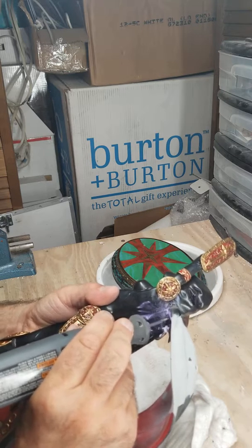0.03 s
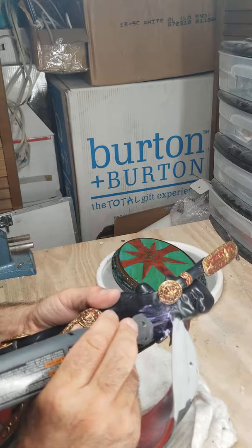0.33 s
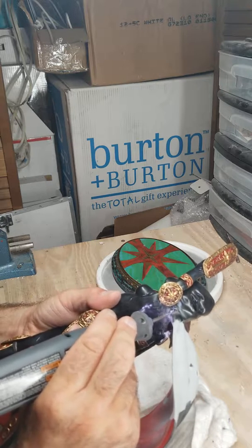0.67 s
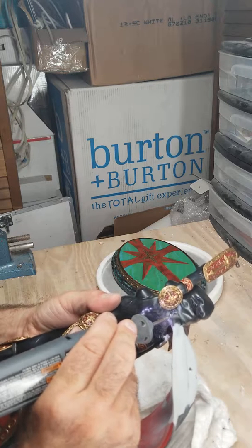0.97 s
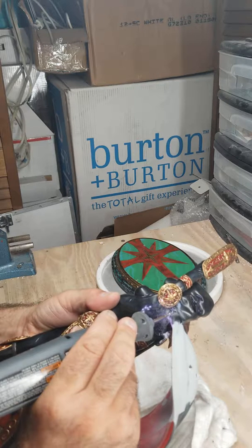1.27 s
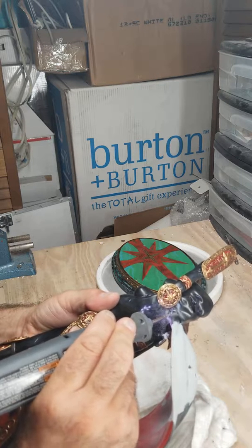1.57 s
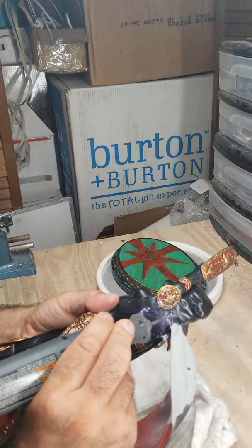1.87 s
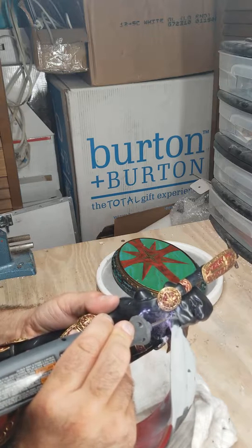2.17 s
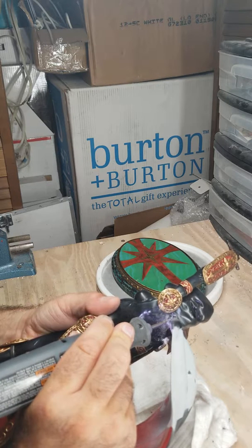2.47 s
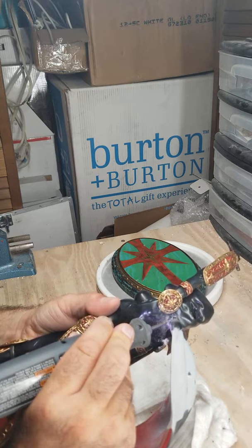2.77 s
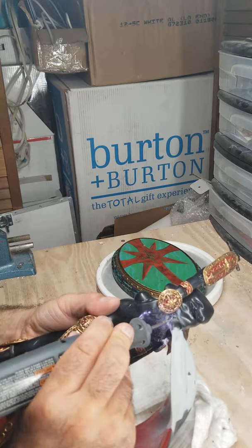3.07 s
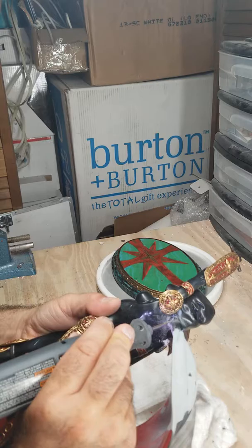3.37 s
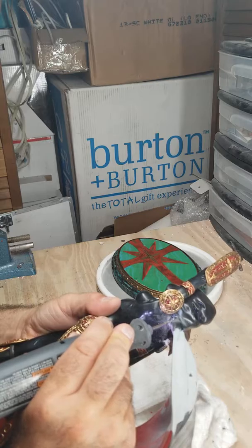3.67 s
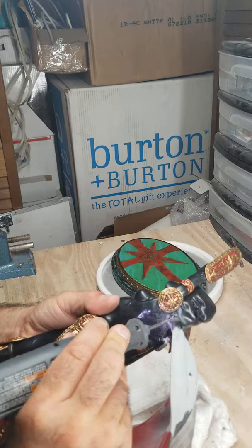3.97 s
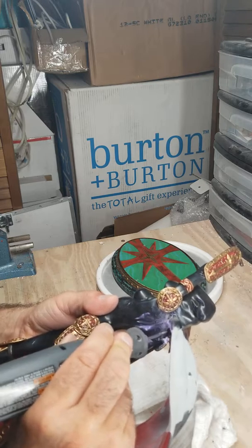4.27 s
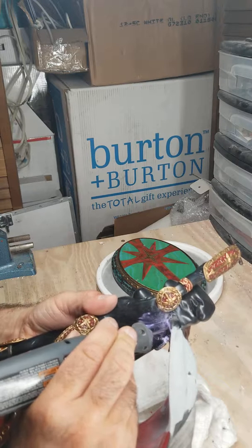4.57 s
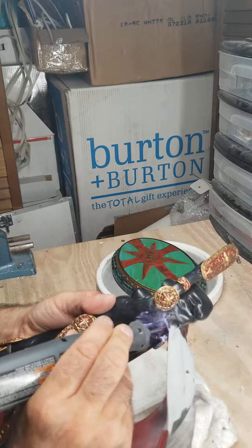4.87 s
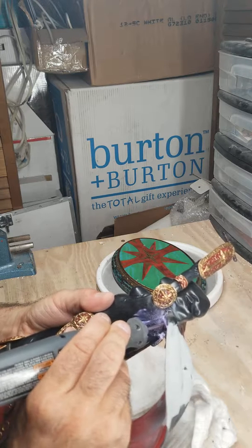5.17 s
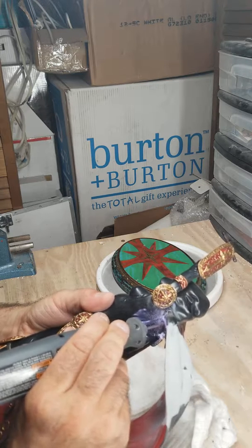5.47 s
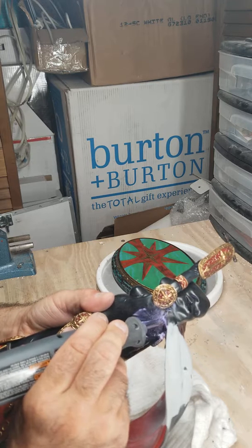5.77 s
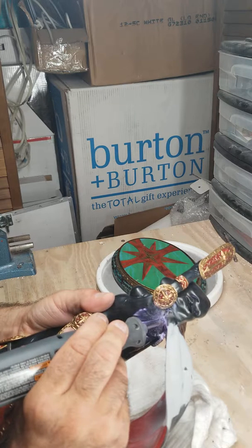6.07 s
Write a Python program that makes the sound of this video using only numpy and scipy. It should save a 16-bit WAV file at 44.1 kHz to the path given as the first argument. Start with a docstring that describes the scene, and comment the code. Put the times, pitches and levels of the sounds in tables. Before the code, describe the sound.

Close to the microphone in a small room, a rotary tool grinds metal with a whine and a gritty hiss. The bit skitters and squeaks at first, then settles into the cut, where the motor pitch drops and a piercing whistle takes over. The grinding stops for a moment while the motor runs free, then the bit skids back on and chatters.

```python
"""Rotary tool grinding a metal rod

A small workshop, a two-port microphone close to a cordless tool. The motor whines and sags under load.
The bit rasps and hisses with every turn, knocks as it skids, squeals when it binds, whistles once seated
in the cut and chatters on every second turn. Near 4 s it is lifted, spins up and is set down again."""
import sys
import numpy as np
from scipy import signal
from scipy.fft import rfft, irfft
from scipy.io import wavfile
from scipy.ndimage import uniform_filter1d, map_coordinates

SR = 44100
rng = np.random.default_rng(int(sys.argv[2]) if len(sys.argv) > 2 else 0)


def transcribe(signal):
    """Save signal, clipped to [-1, 1], as a 16-bit WAV file at the path in sys.argv[1]."""
    frames = np.atleast_2d(signal).T
    limited = np.clip(frames, -1, 1)
    pcm = np.round(limited * 32767).astype(np.int16)
    wavfile.write(sys.argv[1], SR, pcm)


N = 278174
TIME = np.arange(N) / SR
HZ = np.fft.rfftfreq(N, 1 / SR)
RIM_HZ, RIM_HALF_WIDTH_HZ = 12940, 550  # high resonance of the bit that picks out overtones

# motor tones: t/s, unbalance hum/dB, third order/dB, whine/dB
MOTOR_LEVELS = [(0, -56, -37, -39), (.18, -54, -34.5, -41.5), (.2, -50.5, -30.5, -37), (.29, -59, -29, -41),
                (.31, -45, -35.5, -37.5), (.53, -46.5, -32, -34.5), (.55, -57, -41, -45),
                (.73, -47.5, -32, -28.5), (.785, -52, -45.5, -28), (.88, -52, -35, -33.5),
                (1.03, -55.5, -36, -31.5), (1.12, -54, -43, -37.5), (1.48, -54.5, -41, -41),
                (1.66, -50.5, -67, -35), (1.8, -48, -72, -37.5), (2.1, -48, -54, -38.5),
                (2.6, -47, -56, -39), (2.85, -47, -68, -38), (3.75, -47, -64, -42.5), (3.95, -50, -57, -36),
                (4.02, -68, -50, -51), (4.14, -61, -42.5, -41.5), (4.76, -60, -37, -47),
                (4.84, -47, -37, -36.5), (5.6, -43, -41.5, -45.5), (6.31, -42, -42.5, -48.5)]
# whistle of the seated bit: t/s, lower partial/dB, upper partial/dB, sidebands/dB
WHISTLE_LEVELS = [(2.55, -90, -90, -90), (2.66, -41, -34, -37), (2.71, -48, -26, -38),
                  (2.77, -36, -20, -31), (2.85, -27, -15.5, -26), (2.96, -27, -16, -26),
                  (3.03, -37, -17, -30.5), (3.14, -25, -21.5, -32.5), (3.21, -22, -12.5, -27.5),
                  (3.28, -23, -16, -26), (3.37, -16, -14, -23), (3.43, -18, -16, -22.5),
                  (3.5, -16.5, -25, -26), (3.58, -14, -10, -23.5), (3.69, -14.5, -13, -23),
                  (3.845, -14.5, -15, -26), (3.88, -43, -34, -48), (3.98, -90, -90, -90)]


def gain_of(db):
    """Decibels to amplitude."""
    return 10 ** (np.asarray(db) / 20)


def unit_rms(x):
    """Scale to an rms of 1."""
    return x / np.sqrt(np.mean(x ** 2) + 1e-20)


def at_hz(points, hz):
    """Interpolate a table over log frequency."""
    f, value = np.transpose(points)
    return np.interp(np.log(hz + 1), np.log(f + 1), value)


def colour(x, spectrum):
    """Filter by a table of gains, then scale to rms 1."""
    return unit_rms(irfft(rfft(x) * gain_of(at_hz(spectrum, HZ)), N))


def wander(rate_hz):
    """Random drift of rms 1, up to the given rate."""
    return unit_rms(irfft(rfft(rng.standard_normal(N)) / (1 + (HZ / rate_hz) ** 4), N))


def curves(rows):
    """Each column of a table, joined by straight lines in time."""
    times, *columns = np.transpose(rows)
    return [np.interp(TIME, times, c) for c in columns]


def sum_db(*levels):
    """Joint level of unrelated sounds."""
    return 10 * np.log10(sum(gain_of(db) ** 2 for db in levels) + 1e-20)


def events(rows, attack_s=0.045, release_s=0.04):
    """Swell, hold and fade (times per 20 dB): joint level, then other columns weighted by amplitude."""
    start, end, db, *columns = np.transpose(rows)[:, :, None]
    db = db - 20 * (np.maximum(start - TIME, 0) / attack_s + np.maximum(TIME - end, 0) / release_s)
    weight = gain_of(db - db.max(0))
    return [sum_db(*db)] + [(weight * c).sum(0) / weight.sum(0) for c in columns]


def ports(x):
    """The tool lies off to one side, so the microphone's ports hear different delay and shading."""
    # phase between the ports: f/Hz, lag of the left/rad
    lag = [(20, 0), (250, -0.4), (1000, 0.51), (1500, 2), (1900, 1.23), (2600, 1.72), (4400, 2.5),
           (5200, 2), (5850, 4.5), (6150, 4), (6400, 4.5), (7000, 4.5), (9000, 4.5), (12000, 6),
           (15000, 12.5)]
    # shading: f/Hz, left minus right/dB
    balance = [(20, 8), (270, -4), (520, 4.5), (1000, -5), (1500, 5), (2100, -1.5), (2600, 5.5),
               (4200, -1.5), (5500, 4.5), (6500, 1.5), (7400, 7), (9000, -2.5), (12500, -3), (15000, 0)]
    delay = np.exp(-1j * at_hz(lag, HZ))
    lean = gain_of(at_hz(balance, HZ) / 2)
    return irfft(rfft(x) * np.array([delay * lean, 1 / lean]), N)


def background(noise_db=-72, mains_hz=60, mains_db=-78):
    """Faint room tone and mains hum."""
    # room tone: f/Hz, level/dB
    spectrum = [(20, -15), (45, 2), (60, 6.5), (120, -1.5), (250, 7.5), (1000, -56), (16000, -39)]
    mid, side = (colour(rng.standard_normal(N), spectrum) for _ in range(2))
    mains = gain_of(mains_db) * np.sin(2 * np.pi * mains_hz * TIME)
    return gain_of(noise_db) * (mid + 0.41 * np.array([side, -side])) + mains


def workshop(x, early_boost=2.96, early_s=0.012, length=12000):
    """Bench and boxes throw back dense early echoes and a short tail, different at each port."""
    # colour of the echoes: f/Hz, level/dB
    spectrum = [(200, -2), (600, -4), (1000, 0), (2000, 0.5), (6000, -4), (9000, -2.5), (15000, 1.5)]
    # reverberation time: f/Hz, t60/s
    decay = [(200, 0.063), (2000, 0.2), (8000, 0.33), (16000, 0.048)]
    t = np.arange(length) / SR
    taps = rng.standard_normal((2, length)) * (rng.random((2, length)) < .1) * (t > .001)
    taps *= 1 + early_boost * np.exp(-t / early_s)
    hz, age, bands = signal.stft(taps, SR, nperseg=256)
    bands = bands * gain_of(-60 * age / at_hz(decay, hz)[:, None])
    tail = signal.istft(bands, SR, nperseg=256)[1]
    tail /= np.linalg.norm(tail, axis=1, keepdims=True)
    wet = signal.fftconvolve(x, tail, axes=1)[:, :N]
    return irfft(rfft(wet) * gain_of(at_hz(spectrum, HZ)), N)


def shaft_tone(turns, order, db, flutter_db):
    """One multiple of the shaft rate, fluttering in level."""
    amplitude = np.sqrt(2) * gain_of(db + flutter_db * wander(33))
    return amplitude * np.sin(2 * np.pi * (order * turns + rng.random()))


def hum(turns):
    """Unbalance shakes the tool once a turn; the second order grows faster when it is pressed down."""
    db = curves(MOTOR_LEVELS)[0]
    return shaft_tone(turns, 1, db, flutter_db=1.06) + shaft_tone(turns, 2, 2 * db + 45.5, flutter_db=1)


def whine(turns, speed, load):
    """Commutator and fan orders: load shifts their weights, and each swells near a shell resonance."""
    # whine partials: shaft order, running free/dB, under load/dB
    weights = [(5, -2.5, -15), (6, -4, -6), (7, -13.5, -14), (8, -10.5, -16.5), (9, -7.5, -8.5),
               (10, -24, -10.5), (11, -13, -16.5), (12, -18, -16), (13, -28, -13), (14, -21, -30),
               (15, -12.5, -23), (16, -22, -19), (17, -31, -30), (18, -21, -52), (23, -27, -16),
               (24, -19, -32), (27, -20, -7)]
    # resonances of the tool's shell: f/Hz, half width/Hz, boost/dB
    shell = [(1031, 4, 8), (1868, 39, 7.5), (2250, 168, 5)]
    _, third_db, whine_db = curves(MOTOR_LEVELS)
    partials = [(3, third_db + 0.5), (4, -46 + 4 * load)]
    partials += [(round(k), whine_db + free + load * (loaded - free)) for k, free, loaded in weights]
    out = 0
    for order, level in partials:
        boost_db = sum(db / (1 + ((order * speed - hz) / width) ** 2) for hz, width, db in shell)
        out = out + shaft_tone(turns, order, level + boost_db, flutter_db=1.36)
    return out


def singing(width_hz=45):
    """Light rubbing keeps one narrow mode of the bit ringing."""
    # light rubs: start/s, end/s, level/dB, f/Hz
    rubs = [(1.77, 1.81, -36.5, 6510), (1.84, 1.98, -36, 6560), (2.02, 2.07, -41.5, 6400),
            (2.13, 2.29, -35, 6406), (2.3, 2.62, -37, 6095), (5.3, 6.31, -41, 6146)]
    db, hz = events(rubs)
    drive = wander(width_hz) + 1j * wander(width_hz)
    return gain_of(db) * (drive * np.exp(2j * np.pi * np.cumsum(hz) / SR)).real


def rod(knocks):
    """The rod and its holder ring after each knock."""
    # their modes: f/Hz, width/Hz, level/dB
    modes = [(142, 48, -36), (931, 94, 1), (1086, 65, 0), (1280, 160, -1), (1726, 150, 0.5),
             (1940, 280, -11), (2125, 108, -4.5), (2610, 240, -12.5), (3190, 270, -8), (4300, 3300, -15)]
    body = 0
    for k, (hz, width, db) in enumerate(modes):
        weight = (-1) ** k * gain_of(db) * np.minimum(HZ / hz, 1) ** 0.61
        body = body + weight / (1 + 1j * (HZ ** 2 - hz ** 2) / (width * HZ + 1))
    return unit_rms(irfft(rfft(knocks) * body, N))


def chatter(turns, db, even_harmonic_cut=0.076, slip_turns=0.0039, unevenness=0.13):
    """An uneven knock on every second turn rings the rod, its whole-turn harmonics slightly softer."""
    turns = turns + slip_turns * wander(150)
    knocks = sum((1 - even_harmonic_cut * (-1) ** k) * np.cos(np.pi * k * turns) for k in range(1, 50))
    return rod(knocks * (1 + unevenness * wander(110))) * gain_of(db + 3.5)


def skidding(turns, db, hit_share=0.65, scatter_db=3.5, slip_turns=0.1):
    """The skidding bit catches the rod on some turns and misses on others, with knocks of uneven size."""
    # how hard a knock drives the rod: f/Hz, level/dB
    spectrum = [(200, -28), (550, -13), (900, -7), (1700, -5), (2300, 8.5), (3300, 4), (5000, 6),
                (9000, -7), (16000, -19)]
    turn = np.maximum.accumulate(np.floor(turns + slip_turns * wander(150)))
    hits = np.diff(turn, prepend=turn[0]) * (rng.random(N) < hit_share)
    knocks = hits * gain_of(scatter_db * np.minimum(rng.standard_normal(N), 1.5))
    return colour(rod(knocks), spectrum) * gain_of(db - 3.5)


def squeal(turns, speed, load, db, hz, scatter, bend=0.11, arch=15.5, overtone_db=-12):
    """Stick-slip on the wall of the cut rings once a turn; light load makes short, widely swept rubs."""
    shortness = 9.2 - 7 * load
    turn, angle = turns.astype(int), turns % 1 - .5
    slip, jolt = rng.standard_normal((turn[-1] + 1, 2)).T
    cycles = hz * angle / speed + bend * shortness ** 2 * angle ** 2 + arch * angle * (angle ** 2 - .05)
    phase = 2 * np.pi * cycles + scatter * (0.24 * slip[turn] + .5 * wander(510))
    burst = np.abs(np.cos(np.pi * angle)) ** shortness * shortness ** 0.45
    burst *= gain_of(3 * scatter * jolt[turn])
    ring = unit_rms(burst * np.sin(phase))
    # the overtone comes late in each rub, and mostly from long, full rubs
    overtone = unit_rms(burst * np.exp(3 * angle) * np.sin(2 * phase + 2 * np.pi * 3 * turns)) / shortness
    overtone = irfft(rfft(overtone) / (1 + 1j * (HZ - RIM_HZ) / RIM_HALF_WIDTH_HZ), N)
    return (ring + gain_of(overtone_db) * overtone) * gain_of(db + 0.39 * wander(25))


def whistle(turns, speed, lower_order=23, upper_order=24, sway_db=2, sweep=0.42):
    """Deep in the cut the bit's ring locks to the shaft: two partials, sidebands and a high overtone."""
    # sidebands from each turn's rub: shaft order, level/dB
    sidebands = [(20, -24), (21, -10), (22, -3), (25, 0), (26, 2.5), (27, -8), (28, -4.5), (29, -9),
                 (30, -17), (31, -17), (32, -29)]
    lower_db, upper_db, sides_db = curves(WHISTLE_LEVELS)
    partials = [(lower_order, lower_db), (upper_order, upper_db)]
    partials += [(round(k), sides_db + db + sway_db * wander(15)) for k, db in sidebands]
    for k in range(45, 56):
        rim_db = -20 * np.log10(1 + ((k * speed - RIM_HZ) / RIM_HALF_WIDTH_HZ) ** 2)
        partials.append((k, sides_db - 5 + rim_db + sway_db * wander(34)))
    out = 0
    for k, db in partials:
        phase = 2 * np.pi * k * turns + sweep * (k - upper_order) ** 2
        out = out + gain_of(db - 2.5) * np.cos(phase)
    return np.sqrt(2) * out


def grit(turns, spectrum, memory, grain_db, throb, scattered_share, grains=160):
    """The grains round the rim strike again every turn, slowly wearing; the high side bites hardest."""
    def strikes():
        fresh = rng.standard_normal((int(turns[-1]) + 40, grains))
        rim = signal.lfilter([1], [1, -memory], fresh, axis=0)[30:]
        rim *= gain_of(grain_db * rng.standard_normal(rim.shape))
        passing = map_coordinates(rim.ravel(), [turns * grains], order=3)
        return colour(passing * np.exp(-throb * np.cos(2 * np.pi * turns)), spectrum)

    direct = ports(strikes())
    scattered = ports(strikes()) * np.array([[1], [-1]])  # arrives from all round the cut
    return np.sqrt(1 - scattered_share) * direct + np.sqrt(scattered_share) * scattered


def abrasion(load, bind_db, chatter_db, skid_db, contact_db=-45):
    """Rasp and hiss levels: skids and bounces add rasp, and a binding bit tears off more chips."""
    # how hard the grit cuts: t/s, hiss level/dB
    cutting = [(0, -43.5), (.18, -45.5), (.21, -38.5), (.45, -38.5), (.6, -46), (.7, -34), (1.05, -33),
               (1.22, -37), (1.27, -33), (1.75, -38), (2.65, -39), (3.96, -35), (4.02, -57), (4.42, -49),
               (4.56, -40.5), (4.8, -46.5), (5.55, -41.5), (6.31, -44)]
    cut_db, = curves(cutting)
    lifted_db = 0.29 * np.minimum(cut_db - contact_db, 0)  # the rasp fades as the bit lifts
    rasp_db = sum_db(-39.5 + 0.5 * load + lifted_db, skid_db - 3, chatter_db - 6)
    hiss_db = sum_db(cut_db, bind_db - 3 - 17 * load)
    return rasp_db, hiss_db


def grinding(turns, load, rasp_db, hiss_db):
    """Grit shakes the rod with a rasp and tears off chips with a hiss; both buzz in steady contact."""
    # rasp of the rod: f/Hz, level/dB
    rasp_spectrum = [(20, -44), (100, -24), (250, -19), (450, -6.5), (650, -10.5), (850, 1), (1500, -1.5),
                     (2000, -2), (2700, -3.5), (3400, -5), (4300, -8.5), (6500, -10), (9000, -27),
                     (16000, -11.5)]
    # hiss of the chips: f/Hz, level/dB
    hiss_spectrum = [(1500, -31.5), (3000, -4), (4000, -17), (5300, 3), (7400, 5), (8500, 0), (10000, -0.5),
                     (11500, 1.5), (12600, 6), (14000, -3.5), (15800, 5)]
    # each turn repeats the last best when the bit is loaded and the rod is still
    repeats = np.clip(1 - (rasp_db + 41) / 11, .1, 1) * (0.41 + .55 * load ** 2)
    bite = wander(85)
    coarse = grit(turns, rasp_spectrum, memory=0.37, grain_db=4.5, throb=0.29, scattered_share=0.28)
    buzz = grit(turns, rasp_spectrum, memory=0.9, grain_db=1, throb=0.36, scattered_share=0.3)
    rasp = np.sqrt(repeats) * buzz + np.sqrt(1 - repeats) * coarse
    loose = grit(turns, hiss_spectrum, memory=0, grain_db=-2, throb=0.078, scattered_share=1)
    steady = grit(turns, hiss_spectrum, memory=0.904, grain_db=-1.5, throb=0.29, scattered_share=0.22)
    hiss = np.sqrt(repeats) * steady + np.sqrt(1 - repeats) * loose
    return rasp * gain_of(rasp_db - 1 + 0.38 * bite) + hiss * gain_of(hiss_db + 4 + 1.65 * bite)


def scene(free_hz=298.5, loaded_hz=255.6, inertia_s=0.045):
    """One shaft drives the tool's sounds, its sag telling the load; tones arrive drier than grinding."""
    # shaft speed: t/s, f/Hz
    shaft = [(0.0, 305.1), (0.25, 310.1), (0.49, 292.5), (0.67, 302.1), (0.8, 291.3), (1.04, 284.9),
             (1.23, 296.2), (1.52, 283.1), (1.57, 279.3), (1.72, 273.9), (2.13, 251.7), (2.39, 244.3),
             (2.66, 259.7), (3.05, 259.5), (3.7, 254.7), (3.85, 255.7), (4.08, 297.9), (4.24, 306.8),
             (4.53, 309.1), (4.84, 282.6), (5.02, 275.8), (5.65, 274.7), (5.9, 270.5), (6.31, 272.0)]
    # the bit binds in the cut: start/s, end/s, squeal level/dB, f/Hz, turn-to-turn scatter (factor)
    binds = [(.705, .725, -27, 5650, 0.58), (.745, .775, -19, 5580, 0.45), (.818, .84, -20.5, 5600, 0.77),
             (.888, .955, -17, 5500, 0.21), (.97, 1.015, -19, 5460, 0.14), (1.035, 1.06, -29, 5400, 0.87),
             (1.39, 1.422, -23, 5700, 0.55), (1.44, 1.453, -32, 5800, 0.51),
             (1.498, 1.512, -21.5, 5700, 0.54), (1.53, 1.543, -28, 6000, 0.43),
             (1.58, 1.6, -25.5, 6100, 0.44), (1.632, 1.688, -21.5, 5850, .15), (1.79, 2.64, -42, 6700, 0.3),
             (3.86, 3.903, -21.5, 6240, 0.35), (3.925, 3.94, -23.5, 5870, 0.5),
             (3.955, 3.968, -38, 4970, 0.64), (4.417, 4.422, -45, 5800, 1.06),
             (5.945, 5.97, -25, 6440, .08), (6.025, 6.04, -28.5, 6350, .12),
             (6.11, 6.17, -29.5, 6280, 0.14)]
    # the bit bounces on every second turn: start/s, end/s, level/dB
    bounces = [(2.07, 2.715, -39), (4.96, 5.14, -38.5), (5.19, 6.31, -33)]
    # the bit skids without seating: start/s, end/s, level/dB
    skids = [(.19, .22, -32.5), (.305, .425, -29.5), (.44, .55, -32.5), (.63, .665, -27),
             (.672, .785, -26.5), (.82, .84, -47), (.9, 1.0, -35.5), (1.06, 1.078, -29.5),
             (1.09, 1.11, -35.5), (1.18, 1.21, -30.5), (1.225, 1.25, -41), (1.262, 1.35, -32),
             (1.39, 1.412, -37), (3.945, 3.975, -34), (4.528, 4.538, -32.5), (4.56, 4.615, -36),
             (4.655, 4.775, -34)]
    speed = uniform_filter1d(curves(shaft)[0], int(inertia_s * SR), mode="nearest")
    load = np.clip((free_hz - speed) / (free_hz - loaded_hz), 0, 1)
    turns = np.cumsum(speed * (1 + 0.0008 * wander(38.4))) / SR
    bind_db, bind_hz, scatter = events(binds)
    chatter_db, = events(bounces, attack_s=0.15, release_s=0.12)
    skid_db, = events(skids, attack_s=0.035, release_s=0.13)
    motor = hum(turns) + whine(turns, speed, load)
    rubbing = squeal(turns, speed, load, bind_db, bind_hz, scatter) + singing()
    direct = ports(motor + rubbing + chatter(turns, chatter_db) + skidding(turns, skid_db))
    seated = ports(whistle(turns, speed))
    grip_db = sum_db(bind_db, *curves(WHISTLE_LEVELS))
    rasp_db, hiss_db = abrasion(load, grip_db, chatter_db, skid_db)
    rough = grinding(turns, load, rasp_db, hiss_db)
    echoes = workshop(rough + gain_of(-3) * direct + gain_of(-7) * seated)
    return direct + seated + rough + echoes + background()


def record(dry):
    """The recorder cuts off the top treble."""
    lowpass = signal.firwin(511, cutoff=15800, window=("kaiser", 9), fs=SR)
    return signal.oaconvolve(dry, lowpass[None], "same")


dry = scene()
out = record(dry)
transcribe(out)
```